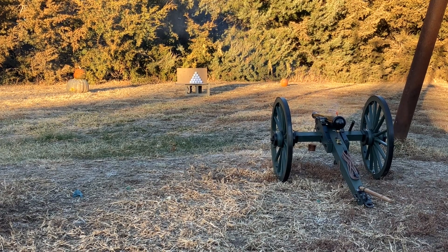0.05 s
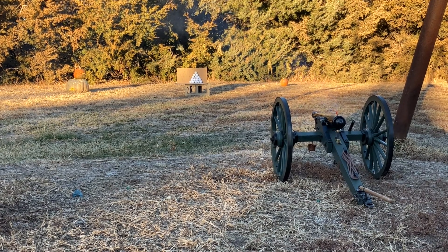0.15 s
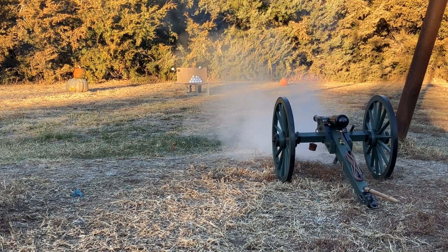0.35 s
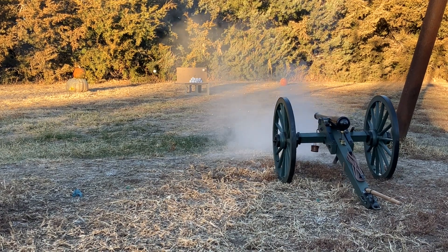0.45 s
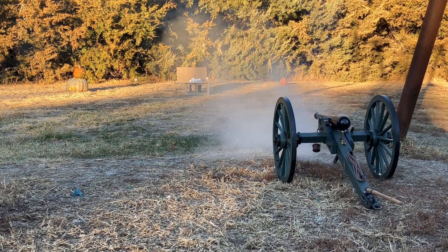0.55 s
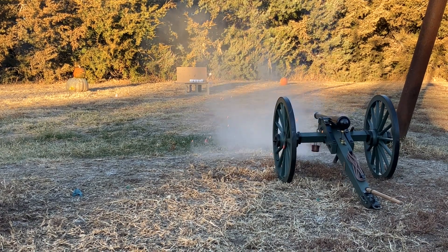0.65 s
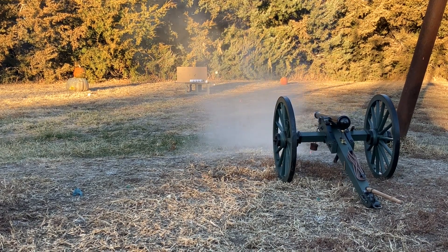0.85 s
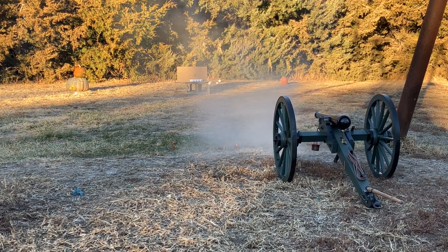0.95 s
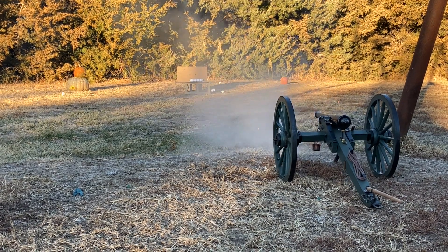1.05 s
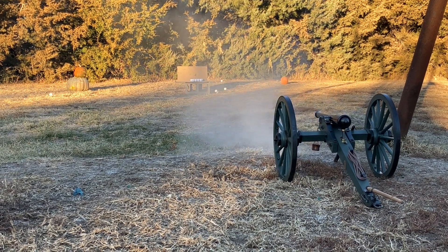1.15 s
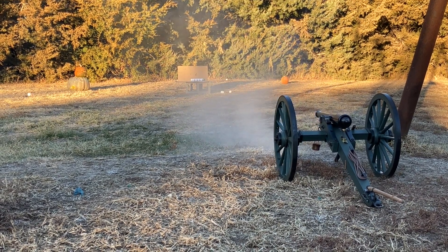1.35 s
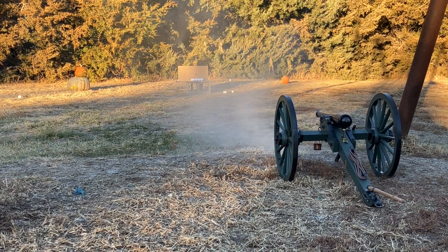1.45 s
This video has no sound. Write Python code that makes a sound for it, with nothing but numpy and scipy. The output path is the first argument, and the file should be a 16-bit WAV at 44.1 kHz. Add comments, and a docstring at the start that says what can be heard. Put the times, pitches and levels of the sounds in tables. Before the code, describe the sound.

A single cannon shot booms outdoors, followed by a short echo and faint low rumble.

```python
"""A small field cannon fires once on an open range, a few metres from a stereo microphone.
Powder fizzes at the vent, then gas tears out of the muzzle with a deep push and sharp cracks.
The tree line throws back a short roar; faint knocks and a low roll return from far down the range.
Debris ticks on the ground and a thin hiss fades into still air. The recorder rounds off the peaks."""
import sys
import numpy as np
from scipy.fft import rfft, irfft, next_fast_len
from scipy.io import wavfile
from scipy.ndimage import map_coordinates

SR = 44100
rng = np.random.default_rng(int(sys.argv[2]) if len(sys.argv) > 2 else 0)


def generate_wav(signal):
    """Clip the signal to [-1, 1] and save it as 16-bit WAV at the path in sys.argv[1]."""
    frames = np.transpose(np.atleast_2d(signal))
    scaled = np.clip(frames, -1, 1) * 32767
    pcm = np.round(scaled).astype(np.int16)
    wavfile.write(sys.argv[1], SR, pcm)


N = 66150
REPORT_START_S, PUSH_S, TREES_S = .2, .233, .31  # arrivals at the microphone

# muzzle gas, left then right channel: (peak time [s], level [dB], rise [dB/s], hold [s])
MUZZLE_GAS = [(0.2269, -13, 1102, 0.0084), (0.232, -14.5, 649.5, 0.0057)]
# its spectrum a few metres off: (frequency [Hz], level [dB])
GAS_COLOUR = [(180, -9), (260, -1.5), (420, -9), (650, -3), (1000, -8), (1550, -5), (1850, -12),
              (2200, -8.5), (4600, -14), (7500, -13.5), (9700, -25), (11500, -17), (15000, -21.5),
              (16500, -28)]
# the gas across the microphone: (frequency [Hz], left-right likeness [correlation])
CLOSE_LIKENESS = [(150, .4), (600, 0), (8000, 0)]
# reflections off the ground and the carriage: (delay [s], level [dB])
BOUNCES = [(.0047, -11), (.0094, -15.5)]
def report():
    """A jet leaves the vent, then ragged gas tears out of the muzzle, different in each channel."""
    t = clock()
    onset_s, fall_db_per_s = .012, 1200.5
    gate = np.clip((t - REPORT_START_S) / onset_s + .5, 0, 1) ** 2
    vent = amp(-31 + 450 * np.minimum(t - .2131, 0)) * (t < PUSH_S)
    muzzle = amp([db - rise * np.maximum(s - t, 0) - fall_db_per_s * np.maximum(t - s - hold, 0)
                  for s, db, rise, hold in MUZZLE_GAS])
    roughness = amp(1.4 * wobble(600))
    gas = gate * np.hypot(vent, muzzle) * roughness * noise(colour(GAS_COLOUR), CLOSE_LIKENESS)
    return gas + sum(amp(db) * filtered(gas, lambda hz: np.exp(-2j * np.pi * hz * delay))
                     for delay, db in BOUNCES)


# the pressure wave, left then right channel: (frequency [Hz], level [dB], t60 [s])
PRESSURE_WAVE = [(100, -2, 0.088), (81.6, -0.5, .058)]
def push():
    """The pressure wave swings low and dies fast, with a slow outflow and the barrel's hollow note."""
    t = clock()
    attack = 1 - np.exp(-np.maximum(t - PUSH_S, 0) / .0023)
    front = -attack * np.array([amp(db) * swing(PUSH_S, hz, t60) for hz, db, t60 in PRESSURE_WAVE])
    outflow = amp(-8.5) * swing(.237, hz=21, t60=.065)
    bore_s, bore_hz = .232, 294
    bore_level = amp(-14) * burst(bore_s, rise_s=.017, t60=.045, hold_s=.012)
    return front + outflow + bore_level * np.cos(2 * np.pi * bore_hz * (t - bore_s))


# the blast's hard edge at the microphone: (left gain [dB], right gain [dB])
EDGE_BALANCE = [-1.5, -12]
def blast_edge():
    """The front of the blast hits the microphone hardest on the left, and eddies buffet both sides."""
    edge = amp(-12) * amp(EDGE_BALANCE)[:, None] * burst(.2245, rise_s=.012, t60=.0094, hold_s=.014)
    eddies = amp(-21) * burst(PUSH_S, rise_s=.07, t60=.066, hold_s=.008) * (clock() > REPORT_START_S)
    opposed = [(100, -.57)]  # left and right partly out of phase
    return edge * noise(band(4700, .53), CLOSE_LIKENESS) + eddies * noise(band(219, .6), opposed)


# sharp cracks around the report: (time [s], level [dB], t60 [s])
CRACKS = [(.2148, -21.5, 0.015), (.267, -36, 0.0083), (0.279, -24.5, 0.006), (0.288, -15.5, 0.003),
          (0.303, -29.5, 0.022)]
# their spectrum: (frequency [Hz], level [dB])
CRACK_COLOUR = [(200, -5), (600, -5), (2000, -7), (3600, 6), (5000, -5), (7000, -2.5), (10000, -6.5),
                (16000, -11.5)]
def cracks():
    """Short bright snaps reach the microphone, each with a brief hard note."""
    snaps = sum(amp(db) * burst(s, rise_s=.012, t60=t60) for s, db, t60 in CRACKS)
    notes = sum(amp(db - 9) * swing(s, hz=3620, t60=.011) for s, db, _ in CRACKS)
    return snaps * noise(colour(CRACK_COLOUR)) + notes


# powder burning at the vent: (frequency [Hz], level [dB])
FIZZ_COLOUR = [(300, -15.5), (1000, -5.5), (2000, 0), (3500, -8.5), (7500, 2.5), (10000, -2.5),
               (15000, -11)]
def priming():
    """Powder fizzes at the vent a few metres away, growing until the charge catches."""
    t = clock() - MUZZLE_GAS[0][0]
    growth_db_per_s = 65
    return amp(-55 + growth_db_per_s * np.minimum(t, 0)) * (t < 0) * noise(colour(FIZZ_COLOUR))


# the roar off the tree line: (band centre [Hz], level [dB], t60 [s])
TREE_ROAR = [(45.4, -41, 0.32), (110, -33, 0.46), (232, -32.5, 0.42), (463, -43.5, 0.52),
             (1190, -41.5, 0.63), (2050, -39.5, 0.64), (4000, -38.5, 0.45), (7800, -44, .34),
             (13500, -50, .27)]
def trees():
    """The ground scatters a little at once, then the tree line answers; the mids last longest."""
    ground = amp(-7) * burst(.268, rise_s=.01, t60=.021, hold_s=.035)
    roar = sum(amp(db) * np.hypot(burst(TREES_S, rise_s=.017, t60=t60), ground) * noise(band(hz, .45))
               for hz, db, t60 in TREE_ROAR)
    return roar * amp(.3 * wobble(130))


def branches():
    """Single trunks and branches speckle the roar with small crackling reflections."""
    hits_per_s, spread_db = 130, 5
    hits = rng.random((2, N)) < hits_per_s / SR
    strength = amp(spread_db * np.clip(rng.standard_normal((2, N)), -2, 2))
    crackle = unit(filtered(hits * strength, band(3300, .8)))
    return amp(-41) * burst(TREES_S, rise_s=.017, t60=.41) * crackle


# knocks from the far end: (time [s], level [dB], frequency [Hz], noise t60 [s])
FAR_KNOCKS = [(.862, -52, 1000, .03), (.8925, -46.5, 850, .017), (1.092, -57.5, 800, .022)]
# low echoes: (time [s], level [dB], pitch [Hz])
THUMPS = [(0.316, -28.5, 240), (.36, -28.5, 164.7), (.4, -36, 148), (.52, -49, 129.6), (0.865, -48, 225),
          (1.098, -51.5, 219), (1.14, -56, 140)]
def range_echoes():
    """The shot comes back from down the range as dry knocks and low thumps."""
    echoes = np.zeros((2, N))
    for s, db, hz, t60 in FAR_KNOCKS:
        scatter = burst(s, rise_s=.002, t60=t60) * noise(band(hz, .39))
        echoes += amp(db) * (swing(s, hz, t60 / 2) + .5 * scatter)
    for s, db, hz in THUMPS:
        echoes += amp(db) * burst(s, rise_s=.025, t60=.091) * np.sin(2 * np.pi * hz * (clock() - s))
    return echoes


# the roll from the far end of the field: (band centre [Hz], level [dB], t60 [s])
FAR_ROLL = [(59.4, -67.5, 3.4), (131, -63, 3.03), (263, -70, 2.8), (524.6, -73, 1.62), (1020, -69.5, 1.2),
            (1850, -68.5, 0.73), (3700, -76.5, 0.9)]
def roll():
    """Distant woods keep a quiet uneven rumble going, with a faint ring in it."""
    rumble = np.zeros((2, N))
    for hz, db, t60 in FAR_ROLL:
        level = amp(db + .33 * wobble(54)) * burst(.62, rise_s=.4, t60=t60, hold_s=.27)
        rumble += level * noise(band(hz, .37))
    ring = amp(-69) * burst(.76, rise_s=.5, t60=.62, hold_s=.2) * noise(band(2000, .05))
    return rumble + ring


# bits of debris landing: (time [s], level [dB], pitch [Hz])
DEBRIS = [(.629, -60, 4850), (.655, -67, 7800), (1.177, -68, 4300), (1.351, -66, 2380)]
def debris():
    """Each bit strikes the ground with a tiny tick, faint at the microphone."""
    return sum(amp(db) * swing(s, hz, t60=.016) for s, db, hz in DEBRIS)


# the late hiss: (frequency [Hz], level [dB])
HISS_COLOUR = [(3000, -9.5), (4200, -1.5), (5800, -16), (7800, 3.5), (9800, -11), (11500, -0.5),
               (15000, -6.5)]
def hiss():
    """A thin hiss rises behind the echoes and fades."""
    return amp(-71.5) * burst(.77, rise_s=.5, t60=1.7, hold_s=.2094) * noise(colour(HISS_COLOUR))


# still air on the range: (frequency [Hz], level [dB])
AIR_COLOUR = [(25, -10), (60, 3), (110, -1), (260, -4.5), (370, -19.5), (600, -23), (1100, -25.5),
              (2200, -29.5), (3000, -37.5), (8000, -41.5), (16000, -47)]
def air():
    """The open range lays a quiet, steady, low bed under the shot."""
    return amp(-66.5) * noise(colour(AIR_COLOUR))


# open-air sound across the microphone: (frequency [Hz], left-right likeness [correlation])
OUTDOOR_LIKENESS = [(40, 1), (150, .85), (400, 0.32), (1500, 0.069), (8000, 0.076)]
def noise(gain, likeness=OUTDOOR_LIKENESS):
    """Stereo noise of rms 1 with a given gain and left-right likeness per frequency."""
    def mid_side(hz):
        angle = np.arccos(np.clip(along(likeness, hz), -1, 1)) / 2
        return gain(hz) * np.array([np.cos(angle), np.sin(angle)])
    mid, side = filtered(rng.standard_normal((2, N)), mid_side)
    return unit(np.array([mid + side, mid - side]))


def amp(db):
    """Decibels to gain."""
    return 10 ** (np.asarray(db) / 20)


def unit(x):
    """Scaled to rms 1."""
    return x / np.sqrt(np.mean(x ** 2) + 1e-20)


def clock():
    """The time of each sample."""
    return np.arange(N) / SR


def along(points, hz):
    """(Hz, value) points read on a log axis."""
    freqs, values = np.transpose(points)
    return np.interp(np.log(hz + 1), np.log(freqs + 1), values)


def filtered(x, response):
    """x passed through a frequency response."""
    size = next_fast_len(N + SR // 2)
    return irfft(rfft(x, size) * response(np.fft.rfftfreq(size, 1 / SR)), size)[..., :N]


def wobble(rate):
    """A smooth random curve, rate knots a second."""
    return map_coordinates(rng.standard_normal(N), [clock() * rate], mode="wrap")


def colour(points):
    """The gain of a spectrum, rolled off below its first point."""
    return lambda hz: amp(along(points, hz)) / np.sqrt(1 + (points[0][0] / (hz + 1)) ** 8)


def band(centre_hz, octaves):
    """The gain of a bell on a log axis."""
    return lambda hz: np.exp(-.5 * (np.log2((hz + 1) / centre_hz) / octaves) ** 2)


def burst(s, rise_s, t60, hold_s=0):
    """Climbs 60 dB in rise_s up to time s, holds, then falls 60 dB in t60."""
    t = clock() - s
    return amp(-60 * (np.maximum(-t, 0) / rise_s + np.maximum(t - hold_s, 0) / t60))


def swing(s, hz, t60):
    """A damped oscillation set off at time s."""
    t = np.maximum(clock() - s, 0)
    return np.sin(2 * np.pi * hz * t) * amp(-60 * t / t60)


def scene():
    """At the microphone: the close shot, its echoes down the range and the still air."""
    shot = priming() + report() + blast_edge() + push() + cracks()
    echoes = trees() + branches() + roll() + range_echoes()
    return shot + echoes + debris() + hiss() + air()


def record(dry):
    """The recorder rounds off the highest peaks and keeps nothing above its band limit."""
    ceiling, top_hz = 1.3, 16300
    clipped = dry / (1 + np.abs(dry / ceiling) ** 6) ** (1 / 6)
    return filtered(clipped, lambda hz: hz < top_hz)


dry = scene()
out = record(dry)
generate_wav(out)
```